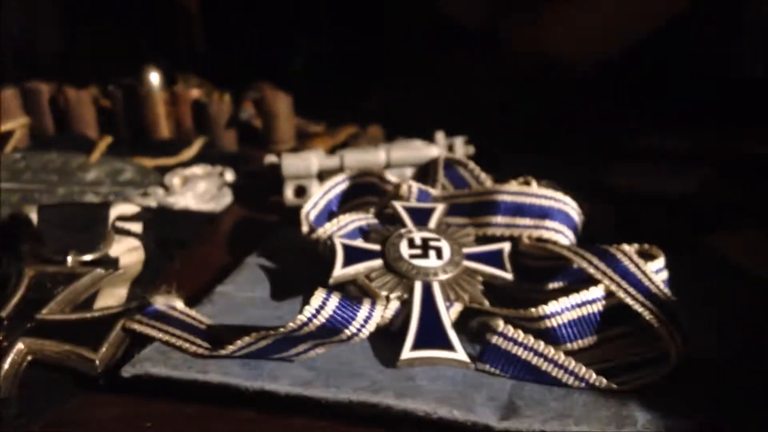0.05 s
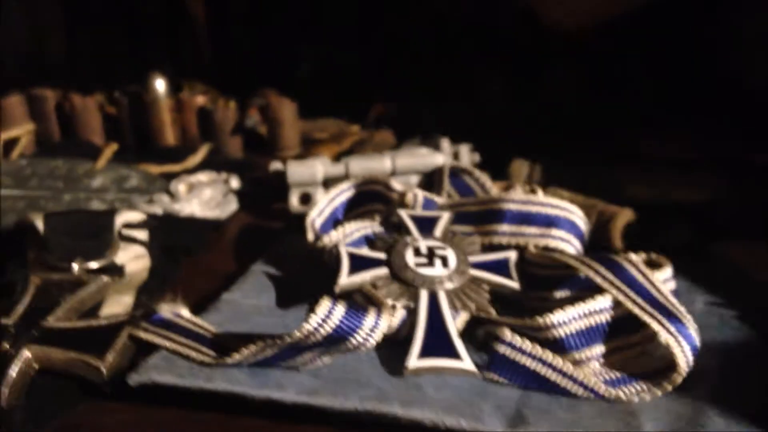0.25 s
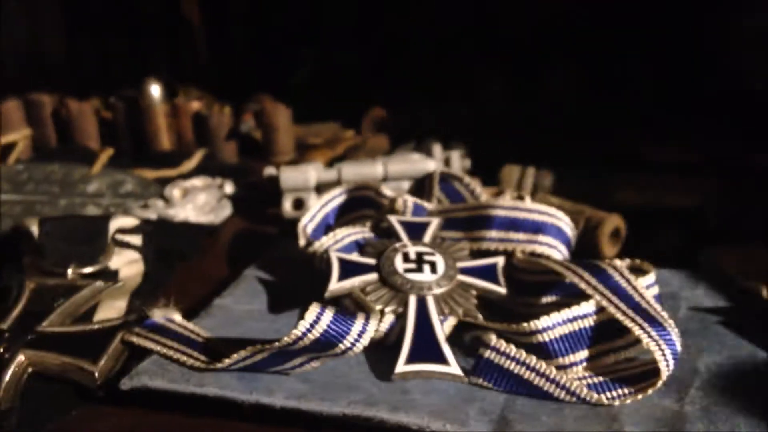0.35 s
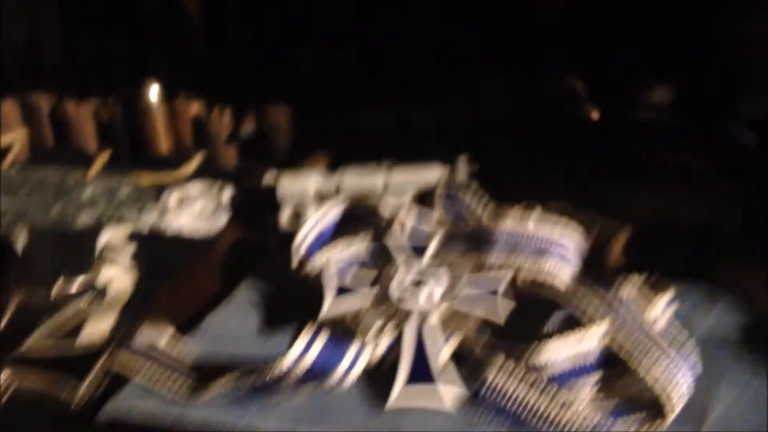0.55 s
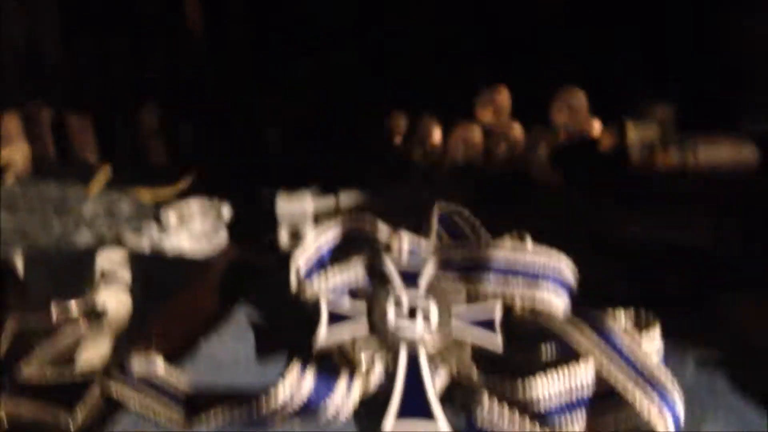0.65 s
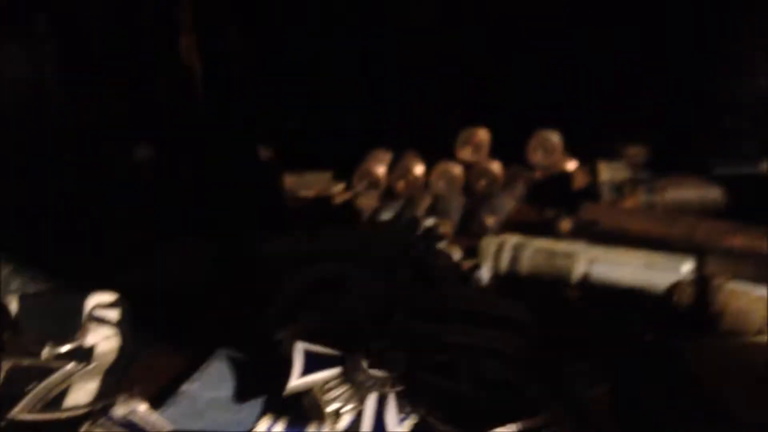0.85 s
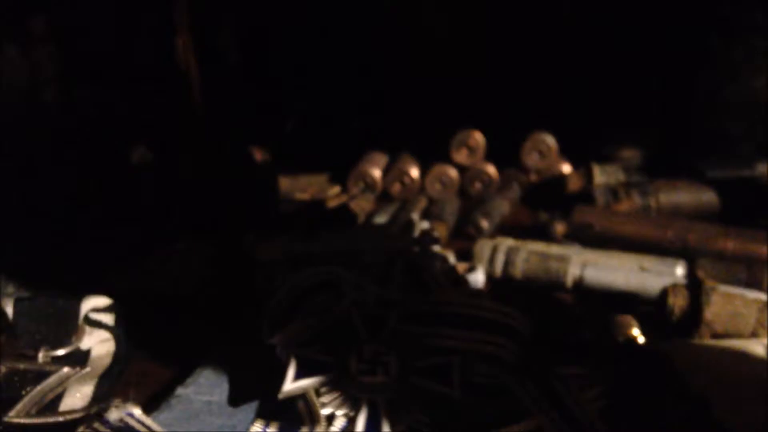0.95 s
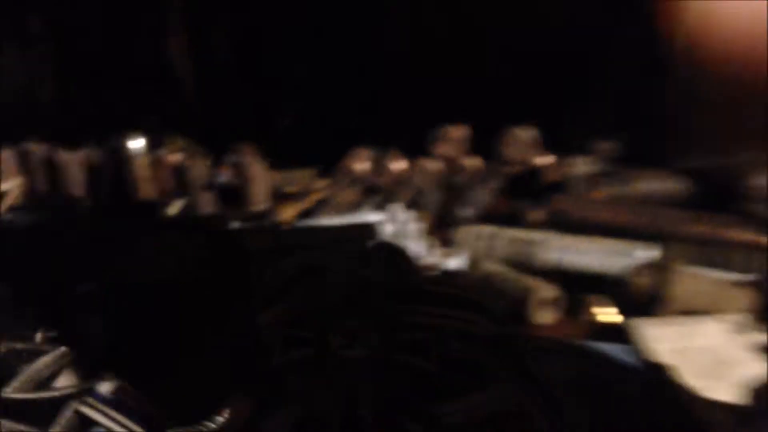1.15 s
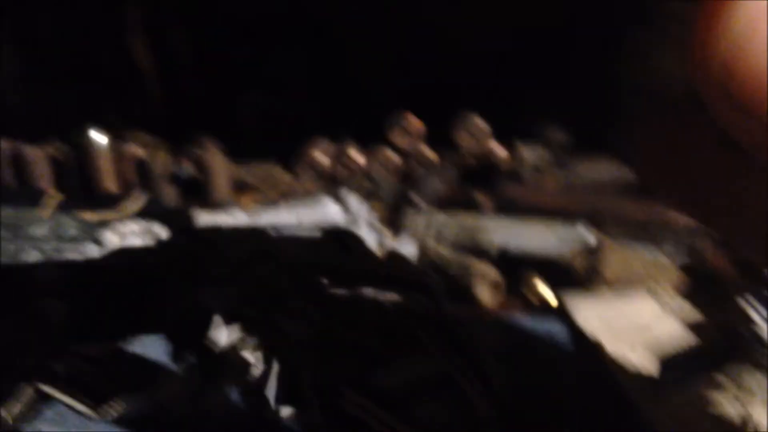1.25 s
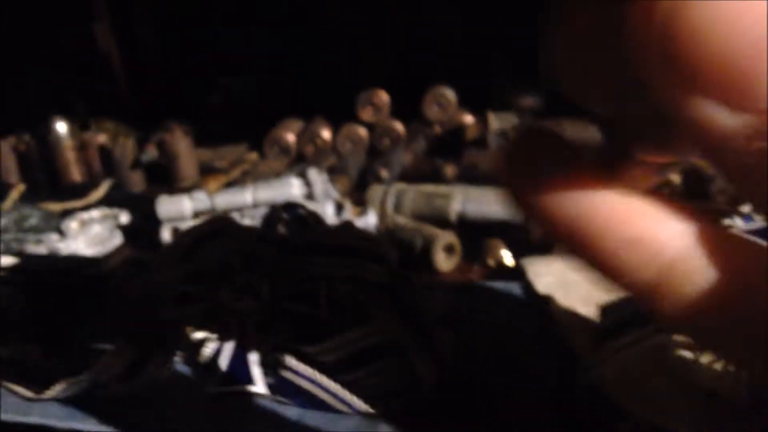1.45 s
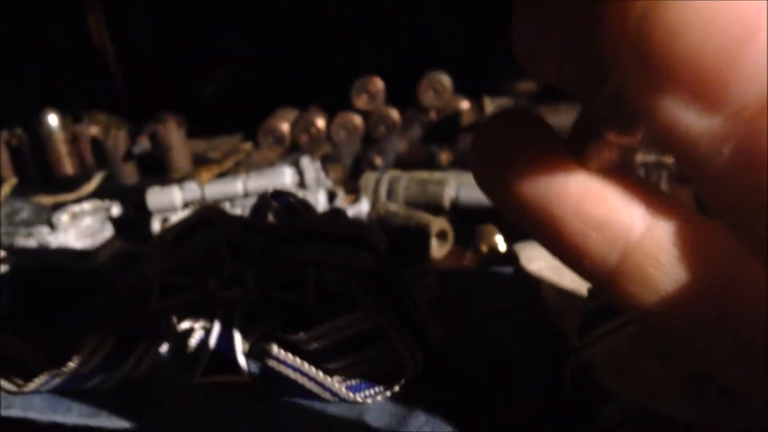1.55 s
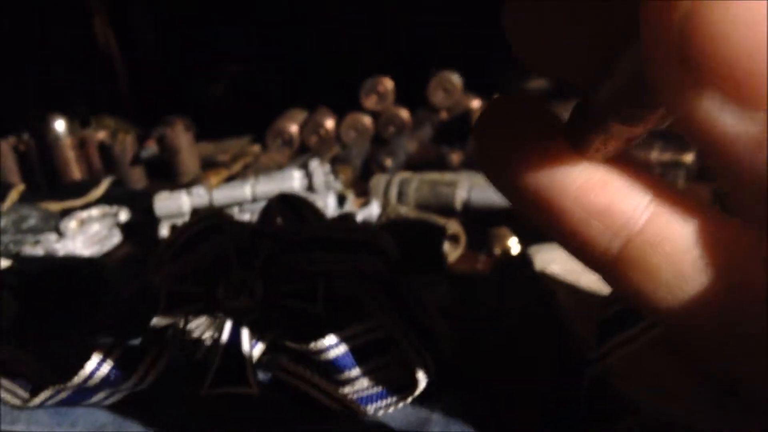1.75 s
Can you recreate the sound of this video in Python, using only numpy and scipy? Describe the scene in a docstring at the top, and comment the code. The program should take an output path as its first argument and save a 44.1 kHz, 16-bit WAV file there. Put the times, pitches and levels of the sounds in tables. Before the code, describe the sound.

Small brass cartridge casings clink in a heap on a wooden table. Dull, faint wooden bumps and light stirring open at 0-0.15 s; clinks grow, with a hard, bright clack at 0.22 s, then slide and scatter, one rocking to rest by 0.38 s. Afterwards a quiet room: faint hiss, low rumble, soft handling bumps near 0.9 and 1.45 s, tiny ticks at 0.9 and 1.57 s. Close small microphone.

```python
"""A dull wooden bump, then small brass casings rattling as fingers stir the heap on a wooden table.
They slide and clink, one knocks hard, one rocks to rest: decaying modes of heap, brass and table,
struck singly or driven by random contacts. Then a quiet room: soft sine bumps of the hand holding
the recorder, tiny modal ticks, and filtered noise for microphone hiss and low rumble."""
import sys
import numpy as np
from scipy import signal
from scipy.fft import rfft, irfft
from scipy.io import wavfile
from scipy.ndimage import uniform_filter1d

SR = 44100
rng = np.random.default_rng(int(sys.argv[2]) if len(sys.argv) > 2 else 0)


def ratio(d):
    """dB to gain"""
    e = np.asarray(d, float) / 20
    return 10 ** e


def generate_wav(signal):
    """Clip the signal to [-1, 1] and save it as 16-bit WAV at the path in sys.argv[1]."""
    frames = np.transpose(np.atleast_2d(signal))
    scaled = np.clip(frames, -1, 1) * 32767
    pcm = np.round(scaled).astype(np.int16)
    wavfile.write(sys.argv[1], SR, pcm)


N = 79380  # samples, 1.8 s

# single clinks: t/s, clack peak/dB, strongest clack f/Hz, brass ring peak/dB, strongest ring f/Hz
CLINK_EVENTS = [(0.0471, -47, 3300, -57, 7260), (.0600, -44.5, 2600, -58.5, 6860),
                (.0680, -46, 3300, -58, 8030), (.0960, -42.5, 1480, -51.5, 10300),
                (0.0962, -49.5, 3000, -52, 14520), (.0975, -47.5, 2400, -52.5, 6600),
                (0.1215, -40.5, 2243, -51.5, 6900), (0.1561, -34, 2400, -43, 10900),
                (0.1596, -19.5, 2400, -43, 11260), (0.1638, -23.5, 2200, -52, 6100),
                (0.2037, -34.5, 4504, -32, 9000), (.2090, -32.5, 2500, -36.5, 7967),
                (0.221, -20.5, 2800, -54.5, 6000), (.2228, -1.5, 3735, -29.5, 11000),
                (.2238, -4.5, 3000, -23.5, 14380), (0.2258, -16, 2200, -21.5, 6100),
                (.2300, -20.5, 2500, -20.5, 6040), (0.2358, -19, 1900, -25.5, 6040),
                (.2490, -26.5, 3408, -38.5, 7200), (.2555, -23.5, 2400, -44, 5981),
                (.2608, -29.5, 2400, -29.5, 10650), (0.289, -29.5, 2400, -32.5, 14060),
                (0.292, -21, 2400, -33.5, 10650), (.3020, -29.5, 2000, -35.5, 6100),
                (0.31, -28, 2500, -40, 11140), (0.3223, -42, 2000, -33.5, 6100),
                (0.329, -38, 1481, -37.5, 8640), (.3455, -46, 3643, -39, 7600),
                (.3530, -51, 1200, -44.5, 6100), (.3670, -41, 1790, -63, 7950),
                (.3790, -44, 1905, -68, 8000)]
# stirring hand: t/s, heap clatter level/dB, brass level re clatter/dB, table level re clatter/dB
STIR_LEVELS = [(0, -56, -6, 13.5), (0.017, -70.5, -19.5, 16.5), (.055, -63, -19, 14.5),
               (0.064, -56, -17, 9.5), (0.093, -52.5, -19, 12.5), (0.123, -51, -19, 10),
               (.14, -57, -18, 11), (0.154, -55, -18.5, 9), (0.16, -41.5, -9.5, 3.5),
               (0.179, -46.5, -14, 8.5), (.205, -37.5, -7.5, -6), (.22, -35.5, -8.5, 4),
               (0.227, -27, -12, -2.5), (.245, -33, -6.5, -7.5), (0.268, -39, -8, -4),
               (.287, -42.5, -7, -5), (0.296, -35.5, -3.5, -16.5), (.33, -39, -6, -7), (.34, -51.5, 0, 2.5),
               (0.367, -60, 3, -10), (0.381, -60, -12, -5), (.392, -92, -14, -3)]
# knuckle or heap bumping the table top: t/s, peak/dB, strongest f/Hz
KNOCK_EVENTS = [(.0002, -33.5, 600), (.008, -36.5, 547.7), (0.063, -42, 450), (.085, -34, 470),
                (0.098, -33.5, 400)]
# modes of a casing wall, free: f/Hz, level/dB, t60/s
BRASS_MODES = [(5400, -11, 0.068), (6040, 3, .09), (6150, -5.5, .08), (6600, -4, 0.022), (7150, -4, 0.036),
               (8010, -6, .1), (7960, -10, 0.088), (9500, -17, .04), (10100, -15.5, 0.044),
               (10650, -7, .12), (10990, -1.5, 0.044), (11300, -12.5, .04), (13840, -11.5, .08),
               (14250, -3.5, .07), (14700, -12, 0.068)]
# modes of casings damped by the heap: f/Hz, level/dB, t60/s
HEAP_MODES = [(1065.9, 0, .05), (1327, -2.5, .05), (1450, -6.5, .04), (1675, -2, 0.062),
              (1850, -3.5, 0.055), (2000, 3.5, 0.022), (2200, -8, 0.02), (2409, 7, 0.021), (2600, -2, .035),
              (2900, -4.5, .03), (3300, -4, .025), (3613, 3, .008), (3689, -9, 0.039), (4334, -9, 0.032),
              (4910, -4.5, .015)]
# modes of the table top, free: f/Hz, level/dB, t60/s
TABLE_MODES = [(183.3, -3.5, 0.19), (320, -2, 0.06), (372, -2, .08), (470, -3.5, 0.14), (580, -2.5, .07),
               (870, -8, 0.061)]
# modes of one casing rocking to rest on the table, free: f/Hz, level/dB, t60/s
ROCKING_MODES = [(515, -6.5, 0.14), (1109, -7, .12), (1214, 0.5, 0.16), (1864, 3, 0.077), (2250, 1, 0.14),
                 (3480, -5, 0.088), (6100, -4, 0.047), (8240, -4, 0.12)]
# bumps of the holding hand: t/s, level/dB, f/Hz, t60/s, first overtone re fundamental/1
BUMP_EVENTS = [(.52, -66.5, 99.6, 0.11, 0.43), (.56, -66.5, 110, .06, 0.32),
               (0.833, -56.5, 216.9, .1, 0.049), (0.892, -41.5, 94.3, 0.056, 0.36),
               (1.016, -61, 170, 0.053, .3), (1.329, -58, 130, .04, .3), (1.445, -48.5, 148.5, 0.039, 0.27),
               (1.456, -38, 105, 0.052, 0.25), (1.489, -56, 120.5, 0.046, .3),
               (1.689, -69.5, 170, 0.055, .2), (1.70, -66, 170, 0.044, .2), (1.75, -51, 150.2, 0.041, .3),
               (1.763, -64, 183, .12, .9), (1.771, -55, 143.5, 0.057, 0.38)]
# tiny ticks: t/s, peak/dB, low f/Hz, high f/Hz, high mode re low/dB
TICK_EVENTS = [(0.894, -50, 1317, 4444, -4.5), (.905, -47, 1200, 4430, 3.5), (1.5675, -43, 2323, 4490, 10),
               (1.5695, -46.5, 2300, 5060, 24)]
# bands of the diffuse tail: centre f/Hz, width/octave, level/dB, t60/s
ROOM_BANDS = [(306, 0.41, -4.5, .5), (600, .5, -9.5, .4), (1200, .5, -11, 0.49), (1690, .3, -7.5, .65),
              (2050, 0.074, -11, 1), (2500, .4, -8.5, .6), (3514, 0.56, -12, .4), (7040, .6, -22, .2)]
# microphone hiss, relative spectrum: f/Hz, level per Hz/dB
HISS_SPECTRUM = [(200, -30.5), (600, -8), (1000, -4), (2000, -5.5), (4000, -1.5), (7000, -3), (10500, -4),
                 (12700, -4.5), (14500, -4), (16000, -6)]
# low rumble, relative spectrum: f/Hz, level per Hz/dB
RUMBLE_SPECTRUM = [(12, -37), (20, -13.5), (102, -2), (189, -7), (218, -9.5), (357, -10.5), (499, -15.5),
                   (900, -27), (1170, -45.5), (1980, -120)]
# mean course of the rumble: t/s, level/dB
RUMBLE_LEVELS = [(0.45, -66.5), (1.212, -72.5), (1.39, -70), (1.516, -70), (1.8, -69)]

CLACK_FOCUS_OCT, RING_FOCUS_OCT, SCATTER_DB = 0.43, 0.15, 2.5
DETUNE_REL, HEAP_DETUNE_REL, CONTACT_S = 0.005, 0.025, 0.00025
THUD_RE_CLACK_DB, CRACK_RE_RING_DB, CRACK_S = -12.5, -27.5, 0.002
CONTACTS_PER_S, CONTACT_SPREAD_DB = 2000, 4
BRASS_RUB_T60_FACTOR, TABLE_RUB_T60_FACTOR, ROCK_T60_FACTOR = 0.25, 0.36, 0.81
ROCK_START_S, ROCK_END_S, ROCK_START_DB, ROCK_FADE_DB = 0.29, 0.381, -42.5, -11
TABLE_LOW_HZ, TICK_T60_S, ROOM_DB = 170, 0.055, -63.5
HISS_AT_1S_DB, HISS_CREEP_DB_PER_S, RUMBLE_FLICKER_DB = -68.5, 1.95, 3.5
MIC_TOP_HZ = 15600


def unit(x):
    """Scales x to rms 1."""
    return x / np.sqrt(np.mean(x ** 2))


def add(out, t_s, x):
    """Mixes x into out from t_s on."""
    i = int(t_s * SR)
    out[i:i + len(x)] += x[:N - i]


def struck(modes, focus_hz, focus_oct, detune_rel):
    """One blow: decaying sines, strongest near focus_hz, levels and pitches scattered; peak 1."""
    hz, db, t60 = np.array(modes).T[:, :, None]
    level_scatter, pitch_scatter = rng.standard_normal((len(modes), 2)).T[:, :, None]
    t = np.arange(SR // 5) / SR
    focus_db = np.maximum(-6 * (np.log2(hz / focus_hz) / focus_oct) ** 2, -18)
    db = db + focus_db + SCATTER_DB * level_scatter
    hz = hz * (1 + detune_rel * pitch_scatter)
    x = (ratio(db - 60 * t / t60) * np.sin(2 * np.pi * hz * t)).sum(0)
    x = x * np.minimum(t / CONTACT_S, 1)
    return x / np.abs(x).max()


def rubbed(modes, contacts, t60_factor):
    """Resonators with t60 scaled by touch, each pushed at random strength at every contact."""
    out = 0
    for hz, db, t60 in modes:
        r = ratio(-60 / (t60_factor * t60) / SR)
        w = 2 * np.pi * hz / SR
        push = contacts * rng.standard_normal(N)
        ringing = signal.lfilter([1], [1, -2 * r * np.cos(w), r * r], push, axis=-1)
        out = out + ratio(db) * np.sin(w) * ringing
    return out


def clinks():
    """Each clink: clack of the heap, ringing brass with a short noise crack, thud in the table."""
    out = np.zeros(N)
    t = np.arange(SR // 50) / SR
    crack_shape = t / CRACK_S * np.exp(1 - t / CRACK_S)
    for t_s, clack_db, clack_hz, ring_db, ring_hz in CLINK_EVENTS:
        clack = struck(HEAP_MODES, clack_hz, CLACK_FOCUS_OCT, HEAP_DETUNE_REL)
        ring = struck(BRASS_MODES, ring_hz, RING_FOCUS_OCT, DETUNE_REL)
        thud = struck(TABLE_MODES, 790, 0.69, DETUNE_REL)
        crack = np.diff(rng.standard_normal(len(t) + 1)) * crack_shape
        add(out, t_s, ratio(clack_db) * clack)
        add(out, t_s, ratio(ring_db) * ring)
        add(out, t_s + 0.002, ratio(clack_db + THUD_RE_CLACK_DB) * thud)
        add(out, t_s, ratio(ring_db + CRACK_RE_RING_DB) * crack)
    return out


def stirring():
    """Dense small contacts of sliding casings excite heap, brass and table."""
    t = np.arange(N) / SR
    t_s, clatter_db, brass_db, table_db = np.array(STIR_LEVELS).T
    out = 0
    for modes, share_db, t60_factor in ((HEAP_MODES, 0, 1),
                                        (BRASS_MODES, brass_db, BRASS_RUB_T60_FACTOR),
                                        (TABLE_MODES, table_db, TABLE_RUB_T60_FACTOR)):
        hit = rng.random(N) < CONTACTS_PER_S / SR
        contacts = hit * ratio(CONTACT_SPREAD_DB * np.minimum(rng.exponential(size=N), 3))
        level = ratio(np.interp(t, t_s, clatter_db + share_db, right=-200))
        # the steady row calibrates the level
        steady, played = rubbed(modes, contacts * np.array([np.ones(N), level]), t60_factor)
        out = out + played / np.sqrt(np.mean(steady ** 2))
    return out


def rocking():
    """Continuous noise pushes keep a few clear tones alive until the casing lies still."""
    t = np.arange(N) / SR
    course_db = np.interp(t, [ROCK_START_S, ROCK_START_S + 0.0076, ROCK_END_S],
                          [-40, 0, ROCK_FADE_DB], left=-200, right=-200)
    pushes = np.array([np.ones(N), ratio(ROCK_START_DB + course_db)])
    steady, played = rubbed(ROCKING_MODES, pushes, ROCK_T60_FACTOR)
    stop = np.exp(-np.maximum(t - ROCK_END_S, 0) / 0.004)
    return played / np.sqrt(np.mean(steady ** 2)) * stop


def knocks():
    """Dull blows on the table modes alone, with no metal in them."""
    out = np.zeros(N)
    for t_s, db, hz in KNOCK_EVENTS:
        add(out, t_s, ratio(db) * struck(TABLE_MODES, hz, 0.6, DETUNE_REL))
    return out


def handling():
    """Soft bumps through the recorder's case, three decaying sines each, and tiny two-toned ticks."""
    out = np.zeros(N)
    t = np.arange(SR // 8) / SR
    for t_s, db, hz, t60, over in BUMP_EVENTS:
        push = (1 - np.exp(-t / 0.0036)) * ratio(db - 60 * t / t60)
        phase = 2 * np.pi * hz * t
        tone = np.sin(phase) + over * np.sin(2.7 * phase) + 0.31 * over * np.sin(4.6 * phase)
        add(out, t_s, 2 * push * tone)
    for t_s, db, low_hz, high_hz, high_db in TICK_EVENTS:
        modes = [(low_hz, 0, TICK_T60_S), (low_hz, -4, TICK_T60_S), (1.09 * low_hz, -3, TICK_T60_S),
                 (high_hz, high_db, 0.3 * TICK_T60_S),
                 (0.953 * high_hz, high_db - 2.5, 0.31 * TICK_T60_S)]
        add(out, t_s, ratio(db) * struck(modes, high_hz, 8.8, DETUNE_REL))
    return out


def room(x):
    """Faint diffuse tail: convolution with noise bands, each dying at its own pace."""
    t = np.arange(int(0.8 * SR)) / SR
    tail = 0
    for hz, width_oct, db, t60 in ROOM_BANDS:
        edges_hz = [hz * 2 ** (-width_oct / 2), hz * 2 ** (width_oct / 2)]
        band = signal.butter(2, edges_hz, "band", fs=SR, output="sos")
        noise = unit(signal.sosfilt(band, rng.standard_normal(len(t))))
        tail = tail + ratio(db - 60 * t / t60) * noise
    tail = tail * np.minimum(t / 0.0033, 1)
    return ratio(ROOM_DB) * signal.fftconvolve(x, tail)[:N]


def colour(points):
    """Noise of rms 1 with the given (f/Hz, level/dB) spectrum."""
    hz, db = np.array(points).T
    f = np.maximum(np.arange(N // 2 + 1) * SR / N, 1)
    shape = ratio(np.interp(np.log(f), np.log(hz), db))
    return unit(irfft(rfft(rng.standard_normal(N)) * shape, N))


def walk(rate_hz):
    """Slow random course of rms 1: noise averaged twice over 1 / rate_hz."""
    k = int(SR / rate_hz)
    return unit(uniform_filter1d(uniform_filter1d(rng.standard_normal(N), k), k))


def background():
    """Slowly rising microphone hiss over a restless low rumble, both shaped noise."""
    t = np.arange(N) / SR
    hiss_db = HISS_AT_1S_DB + HISS_CREEP_DB_PER_S * (t - 1)
    rumble_db = np.interp(t, *np.array(RUMBLE_LEVELS).T) + RUMBLE_FLICKER_DB * walk(25)
    return ratio(hiss_db) * colour(HISS_SPECTRUM) + ratio(rumble_db) * colour(RUMBLE_SPECTRUM)


def scene():
    """One channel; the light table top passes no deep bass, so heap sounds are high-passed."""
    high_pass = signal.butter(4, TABLE_LOW_HZ, "high", fs=SR, output="sos")
    heap = signal.sosfilt(high_pass, clinks() + stirring() + rocking() + knocks())
    return (heap + room(heap) + handling() + background())[None]


def roll_off(x):
    """The treble ends steeply here."""
    return signal.sosfilt(signal.butter(12, 16110, fs=SR, output="sos"), x)


def record(dry):
    """Small microphone that lacks the very top and rounds peaks near full scale."""
    low_pass = signal.butter(12, MIC_TOP_HZ, fs=SR, output="sos")
    x = signal.sosfilt(low_pass, dry)
    mix = x / (1 + np.abs(x) ** 6) ** (1 / 6) * 0.97
    return roll_off(mix)


dry = scene()
out = record(dry)
generate_wav(out)
```